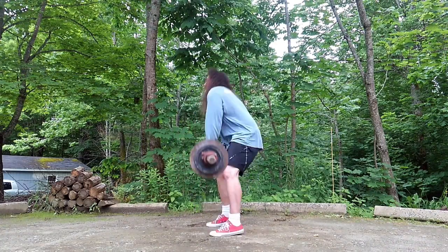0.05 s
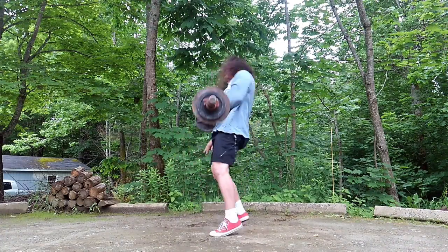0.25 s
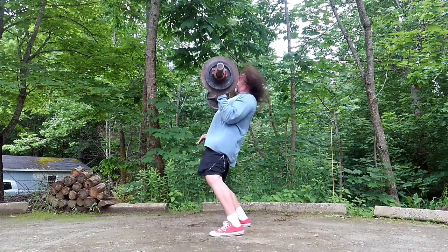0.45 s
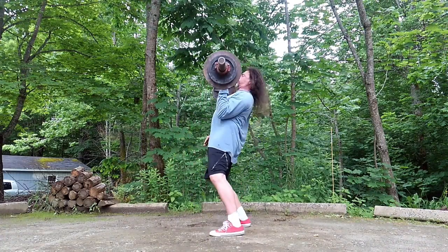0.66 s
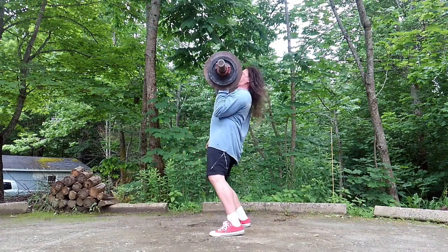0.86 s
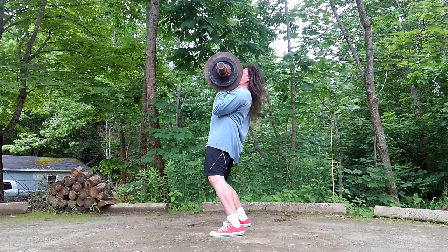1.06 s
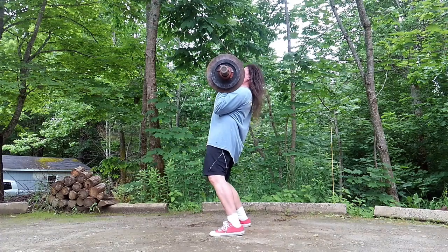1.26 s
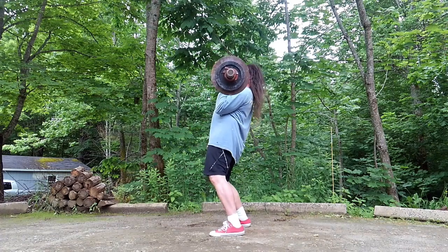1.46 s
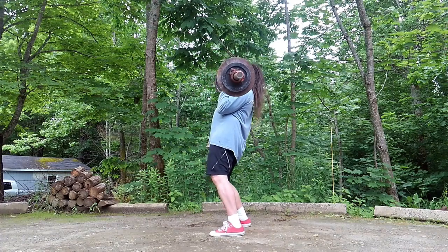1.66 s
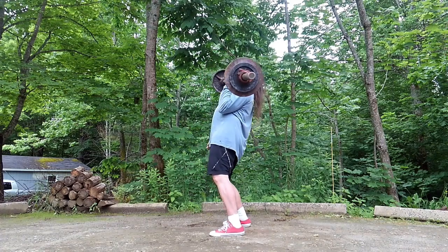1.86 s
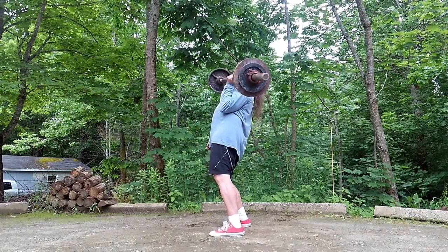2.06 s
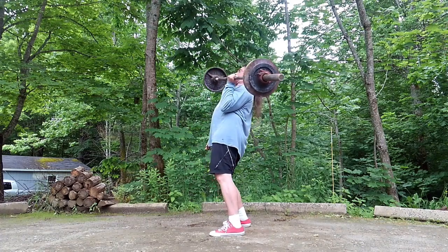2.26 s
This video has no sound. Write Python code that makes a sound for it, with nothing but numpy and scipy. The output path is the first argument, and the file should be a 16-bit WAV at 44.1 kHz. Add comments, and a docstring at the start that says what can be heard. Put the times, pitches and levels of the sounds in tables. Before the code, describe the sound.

Iron barbell plates clank and scrape during a lift, then a faint bird whistles outdoors.

```python
"""A barbell is pulled from the knees to the shoulders in a paved yard at the edge of a wood.
Over an even hiss and a low wavering hum, clothes and hands shuffle as the pull begins.
The bar turns and its loose iron plates scrape along the steel sleeve, seat with dull knocks,
clank against each other and clink on the steel. As they ring out, a far songbird whistles
a swooping phrase, and a longer one about a second later."""
import sys
import numpy as np
from scipy import signal
from scipy.fft import rfft, irfft, next_fast_len
from scipy.io import wavfile
from scipy.ndimage import uniform_filter1d

SR = 44100
rng = np.random.default_rng(int(sys.argv[2]) if len(sys.argv) > 2 else 0)


def waveform_to_disk(signal):
    """Save audio, clipped to [-1, 1], as 16-bit WAV at the path in sys.argv[1]."""
    frames = np.transpose(np.atleast_2d(signal))
    scaled = np.clip(frames, -1, 1) * 32767
    samples = np.round(scaled).astype(np.int16)
    wavfile.write(sys.argv[1], SR, samples)


N = 101429
T = np.arange(N) / SR


def from_db(db):
    """Decibels to gain."""
    return 10 ** (np.asarray(db) / 20)


def rms_one(x):
    """Scale to rms 1."""
    return x / np.sqrt(np.mean(x ** 2) + 1e-20)


def fader(curve):
    """Ride the gain through (time [s], level [dB]) points; silent before and after."""
    times, db = np.transpose(curve)
    return from_db(np.interp(T, times, db)) * (T >= times[0]) * (T <= times[-1])


def equalised(noise, eq):
    """Shape a noise with a (frequency [Hz], gain [dB]) curve; rms 1."""
    hz, db = np.transpose(eq)
    size = next_fast_len(N)
    bin_hz = np.maximum(np.arange(size // 2 + 1) * SR / size, 1)
    gain = from_db(np.interp(np.log(bin_hz), np.log(hz), db))
    return rms_one(irfft(rfft(noise, size) * gain, size)[:N])


def drift(rate_hz):
    """Smooth random modulation; rms 1."""
    pole = np.exp(-2 * np.pi * rate_hz / SR)
    smoothed = signal.lfilter([1], [1, -2 * pole, pole * pole], rng.standard_normal(N + SR))
    return rms_one(smoothed[SR:])


def decay(t60):
    """An envelope that falls 60 dB in t60 seconds."""
    return np.exp(-np.log(1000) * T / t60)


def delayed(x, seconds):
    """Shift a sound later."""
    return np.concatenate([np.zeros(max(int(seconds * SR), 0)), x])[:N]


def grains(per_s=5000, spread_db=3.0):
    """Friction texture: dense clicks of uneven size."""
    sizes = from_db(spread_db * np.minimum(rng.exponential(1, N), 4))
    signs = rng.choice([-1, 1], N)
    return sizes * signs * (rng.random(N) < per_s / SR)


def contact(centre_hz, width_hz):
    """The attack of a hit: a few heavily damped cycles while two parts touch; peak 1."""
    edges_hz = [centre_hz - width_hz / 2, centre_hz + width_hz / 2]
    impulse = (T == 0) + 1e-18
    pulse = signal.sosfilt(signal.butter(4, edges_hz, "band", fs=SR, output="sos"), impulse)
    return pulse / np.abs(pulse).max()


def ring(modes):
    """The tail of a hit: one decaying sine per mode, polarity alternating."""
    return sum((-1) ** k * from_db(db) * decay(t60) * np.sin(2 * np.pi * hz * T)
               for k, (hz, db, t60) in enumerate(modes))


# Bass-heavy tone of the open air: (frequency [Hz], gain [dB])
AIR_EQ = [(40, -5), (60, -4.5), (90, -4.5), (125, -8), (200, -9), (290, -13), (380, -15), (500, -17.5),
          (900, -20), (1700, -25), (3000, -27), (4500, -28), (7000, -31), (11000, -32.5), (15800, -32.5)]


def air(level_db=-47):
    """An even bed of outdoor hiss and rumble."""
    return from_db(level_db) * equalised(rng.standard_normal(N), AIR_EQ)


# Tones of the low hum: (frequency [Hz], level [dB])
HUM_TONES = [(53, -48), (79, -54), (106, -60)]


def hum(waver_hz=1.01, waver_db=1.9):
    """Low sines, each wavering on its own in pitch and level."""
    out = np.zeros(N)
    for hz, db in HUM_TONES:
        phase = 2 * np.pi * np.cumsum(hz + waver_hz * drift(rate_hz=3.9)) / SR
        swell = from_db(waver_db * drift(rate_hz=4.4))
        out += from_db(db) * rms_one(swell * np.sin(phase))
    return out


# Envelope of clothes and hands during the pull: (time [s], level [dB])
SHUFFLE_ENVELOPE = [(.0, -66), (.185, -61), (.235, -38), (.27, -58), (.32, -42), (.37, -57), (.43, -61),
                    (.465, -38.5), (.51, -52), (.6, -50), (.8, -65)]
# Their dull tone: (frequency [Hz], gain [dB])
SHUFFLE_EQ = [(60, -2), (120, -1.5), (350, -8), (650, -2.5), (1200, -11), (2500, -11), (5000, -45.5)]


def clothes_shuffle():
    """Clothes and hands rub in short, grainy swells."""
    return fader(SHUFFLE_ENVELOPE) * equalised(grains(), SHUFFLE_EQ)


# Envelope of the sleeve scraping round: (time [s], level [dB])
SCRAPE_ENVELOPE = [(.17, -70), (.22, -50), (.27, -55), (.31, -49.5), (.36, -46), (.41, -55), (.445, -62),
                   (.455, -38.5), (.488, -41), (.51, -46), (.57, -57), (.62, -60.5), (.82, -57.5)]
# Bright tone of iron on steel: (frequency [Hz], gain [dB])
SCRAPE_EQ = [(800, -2.5), (2000, -6), (3200, -1.5), (4800, 1.5), (5900, -1), (6800, -7.5), (7600, -16),
             (15000, -25)]


def sleeve_scrape():
    """The steel sleeve turns in the plates with a gritty scrape."""
    return fader(SCRAPE_ENVELOPE) * equalised(grains(), SCRAPE_EQ)


# Cues for the plates seating on the sleeve: (time [s], level [dB])
KNOCK_CUES = [(.246, -33), (.2790, -17.5), (.3182, -31.5), (.3225, -38), (.399, -34), (.4632, -24),
              (.4905, -34), (.5560, -26.5), (.6485, -33.5)]
# Low body of the shaken bar: (frequency [Hz], level [dB], t60 [s])
KNOCK_BODY = [(100, -16.5, .13), (162, -15.5, .04), (260, -12.5, 0.03), (405, -23, 0.078)]


def seating_knocks():
    """The plates drop across the play in their holes with a dull knock that shakes the whole bar."""
    knock = contact(centre_hz=700, width_hz=530) + ring(KNOCK_BODY)
    return sum(delayed(from_db(db) * knock, start) for start, db in KNOCK_CUES)


# Cues for the metal hits: (time [s], part that rings, ring level [dB], contact level [dB],
# contact centre [Hz], contact width [Hz], crack level [dB])
CLANK_CUES = [ (.2792, "first plate", -22.5, -19, 1626, 340, -31),
              (.3530, "third plate", -45, -54, 1450, 298, -56),
              (0.427, "first plate", -33.5, -32.5, 2800, 700, -48),
              (0.4477, "bar", -33.5, -7.5, 3650, 610, -22.5),
              (0.4574, "fourth plate", -29, -36, 710, 595, -39), (.4646, "bar", -57, -36, 3600, 900, -32),
              (0.48, "first plate", -38.5, -26, 1730, 594, -42), (.4867, "bar", -47, -20.5, 3580, 800, -30),
              (0.494, "fourth plate", -50, -37, 2420, 297, -47),
              (0.5564, "second plate", -27, -23.5, 1376, 613, -50),
              (0.5641, "second plate", -55, -26, 1510, 590, -45),
              (0.6483, "third plate", -37, -28, 1530, 1300, -61),
              (0.6662, "third plate", -37, -27.5, 1480, 1130, -46), ]
# Modes of each iron plate and of the steel bar, by part: (frequency [Hz])
METAL_PITCHES = { "first plate": [1743, 2747, 1035, 2430, 3348, 3560, 5577], "second plate": [1480, 1275,
                 2490, 3575, 4522, 6245], "third plate": [1453, 1034, 2500], "fourth plate": [693, 1037,
                 1743, 2432, 2747], "bar": [3646, 3855, 4058, 4465, 4732, 5087, 5577, 6492, 6645], }
# How those modes ring, in the same order: (level [dB], t60 [s])
METAL_TAILS = { "first plate": [(0, 0.12), (-15, 0.16), (-20, 0.21), (-17, 0.073), (-15, 0.052),
               (-15.5, 0.086), (-19, 0.096)], "second plate": [(-1, 0.17), (-1.5, .07), (-8.5, 0.067),
               (-20, 0.28), (-20, 0.13), (-26, 0.2)], "third plate": [(1, 0.27), (-14.5, 0.57),
               (-8, 0.068)], "fourth plate": [(4, 0.058), (-22, 0.4), (-7.5, 0.15), (-10.5, 0.3),
               (-12, 0.26)], "bar": [(3, 0.1), (-3, 0.15), (-1, .17), (-27, 0.076), (-12, 0.23),
               (-12, 0.18), (-25, 0.17), (-14, 0.34), (-4, 0.074)], }
# Tone of the crack on top of each hit: (frequency [Hz], gain [dB])
CRACK_EQ = [(300, -27), (1000, -8), (2800, -3), (4500, 2), (6700, -5), (7400, -20.5), (12500, -19.5),
            (16000, -32)]


def plate_clanks():
    """Each hit layers a short contact, a bright crack and the ring of the struck plate or bar."""
    out = np.zeros(N)
    for start, part, ring_db, contact_db, centre_hz, width_hz, crack_db in CLANK_CUES:
        modes = [(hz, db, t60) for hz, (db, t60) in zip(METAL_PITCHES[part], METAL_TAILS[part])]
        attack = from_db(contact_db) * contact(centre_hz, width_hz)
        crack = from_db(crack_db) * equalised(rng.standard_normal(N), CRACK_EQ) * decay(t60=0.018)
        tail = from_db(ring_db) * ring(modes)
        out += delayed(attack + crack + tail, start)
    return out


# The bird's two phrases, each a list of (time [s], pitch [Hz], level [dB])
BIRD_PHRASES = [
    [(.695, 3910, -60), (.71, 3166, -47.5), (.725, 2700, -67), (.76, 2650, -59), (.772, 2880, -54),
     (.779, 3230, -42.5), (.786, 3720, -61)],
    [(1.61, 4027, -76), (1.628, 3080, -54), (1.648, 2950, -60), (1.665, 3250, -53), (1.68, 4600, -65),
     (1.692, 4750, -49), (1.705, 4300, -63), (1.717, 3110, -52), (1.735, 2900, -63), (1.757, 3200, -52.5),
     (1.775, 4650, -73), (1.792, 4600, -51.5), (1.81, 3550, -54), (1.822, 2950, -60), (1.84, 2900, -76)],
]


def songbird(flutter_db=3, echo_s=0.024, echo_db=-17):
    """A slightly fluttering whistle swoops down and up, with one slapback off the trees."""
    song = np.zeros(N)
    for phrase in BIRD_PHRASES:
        times, hz, db = np.transpose(phrase)
        gate = (T > times[0]) * (T < times[-1])
        # Short moving averages round off the corners of pitch and level.
        pitch = uniform_filter1d(np.interp(T, times, hz), size=300)
        gain = uniform_filter1d(from_db(np.interp(T, times, db)) * gate, size=200)
        song += gain * np.sin(2 * np.pi * np.cumsum(pitch) / SR)
    song *= from_db(flutter_db * drift(rate_hz=130))
    return song + from_db(echo_db) * delayed(song, echo_s)


# Bounces off the ground and nearby surfaces: (delay [s], level [dB])
YARD_TAPS = [(.0032, -15), (0.0085, -23), (.039, -42)]


def yard_echoes(sound):
    """Early reflections: each surface returns one quieter, later copy."""
    return sum(from_db(db) * delayed(sound, delay) for delay, db in YARD_TAPS)


def wood_reverb(send, t60=0.49, onset_s=0.0067, high_cut_hz=3500):
    """Trunks and leaves scatter the sound back as a soft, dark tail."""
    tail = rng.standard_normal(N) * decay(t60) * (1 - np.exp(-T / onset_s))
    tail = rms_one(tail) / np.sqrt(N)
    dark_tail = signal.sosfilt(signal.butter(2, high_cut_hz, fs=SR, output="sos"), tail)
    return signal.fftconvolve(send, dark_tail)[:N]


def scene(barbell_send_db=-15.5, bird_send_db=-4):
    """Mono mix over the air and hum: the barbell fairly dry, the bird wetter among the trees."""
    barbell = clothes_shuffle() + sleeve_scrape() + seating_knocks() + plate_clanks()
    song = songbird()
    send = from_db(barbell_send_db) * barbell + from_db(bird_send_db) * song
    return (air() + hum() + barbell + song + yard_echoes(barbell) + wood_reverb(send))[None]


def record(dry, low_cut_hz=47, high_cut_hz=15900):
    """The microphone drops the deep bass; the top is cut steeply."""
    thinned = signal.sosfilt(signal.butter(8, low_cut_hz, "high", fs=SR, output="sos"), dry)
    return signal.sosfilt(signal.ellip(10, .1, 80, high_cut_hz, fs=SR, output="sos"), thinned)


dry = scene()
out = record(dry)
waveform_to_disk(out)
```